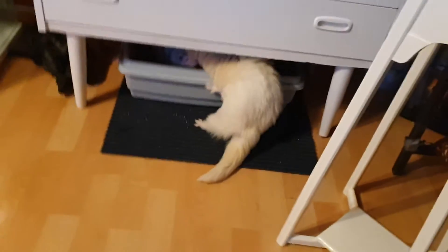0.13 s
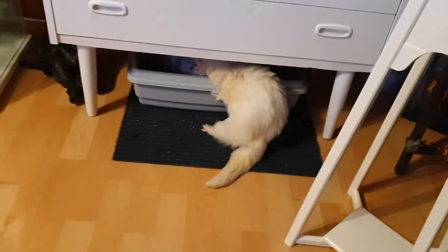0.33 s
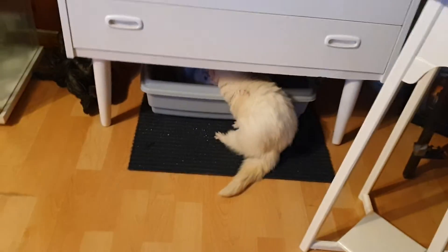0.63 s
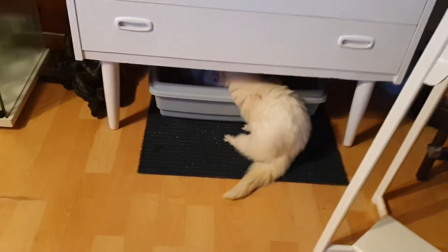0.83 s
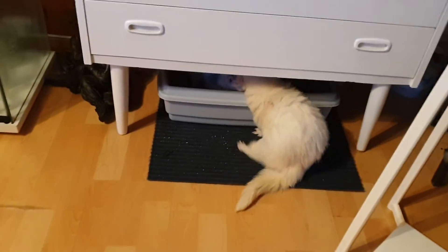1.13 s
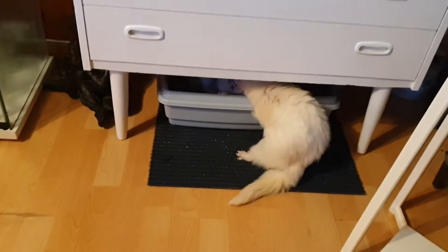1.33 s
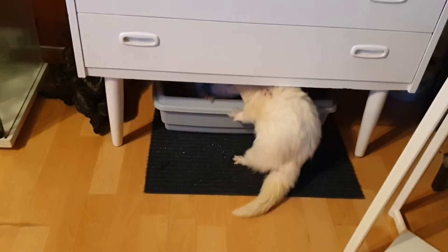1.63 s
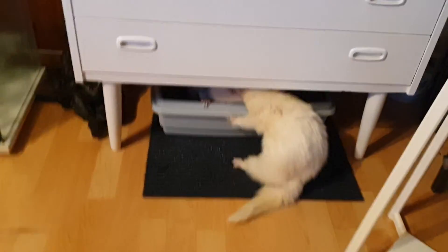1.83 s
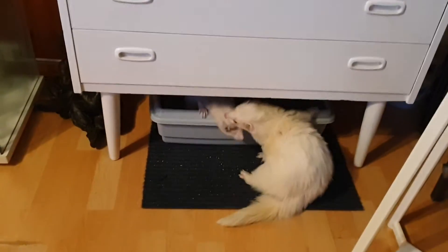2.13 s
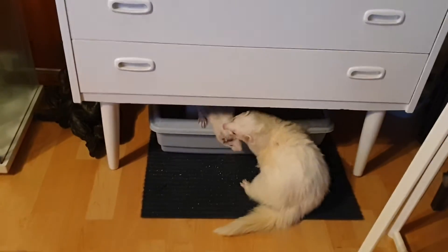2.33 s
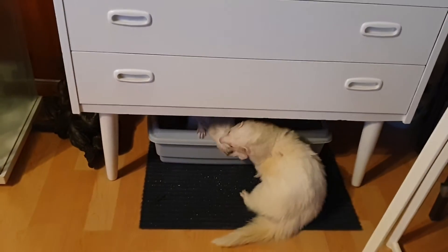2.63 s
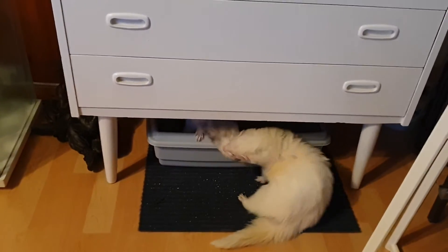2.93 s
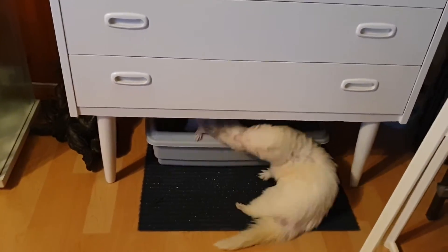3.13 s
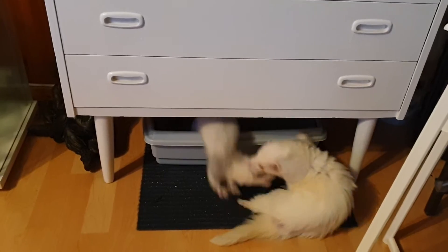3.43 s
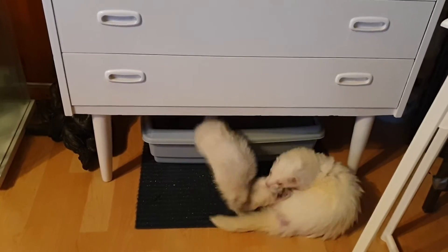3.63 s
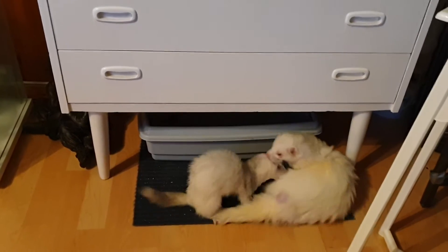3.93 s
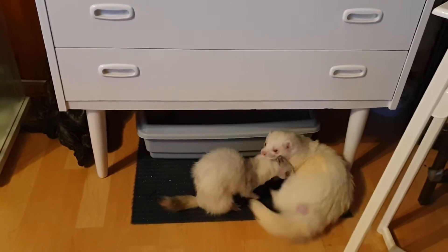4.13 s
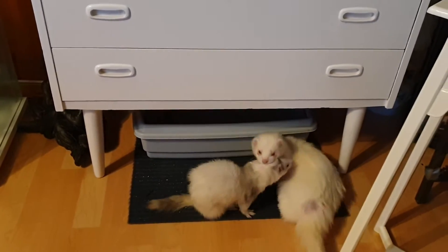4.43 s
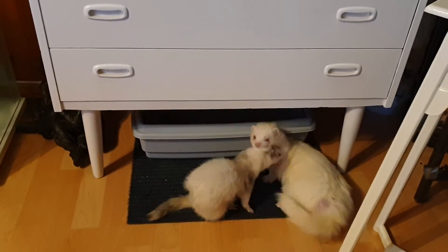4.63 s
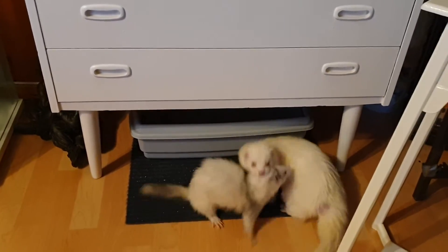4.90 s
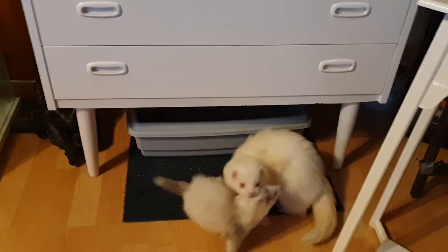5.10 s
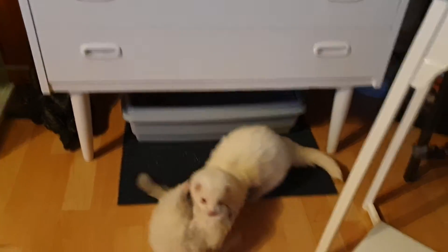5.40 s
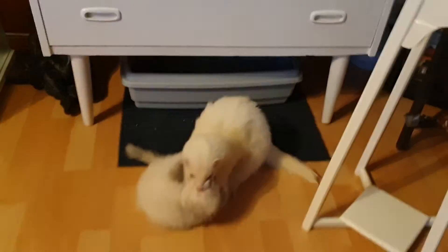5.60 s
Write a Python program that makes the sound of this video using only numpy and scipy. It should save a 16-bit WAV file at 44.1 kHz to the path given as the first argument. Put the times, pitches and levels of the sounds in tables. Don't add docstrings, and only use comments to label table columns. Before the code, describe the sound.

Two ferrets wrestle at a plastic tub on a rubber mat and wooden floor, heard close in a small room over a soft steady hush, the left side louder. Around 0.5 s a cluster of hollow tub thumps and claw scrapes breaks out, with a thin nose whistle just before. From 0.7 to 1.9 s there are faint muffled clucks, hoarse grunts and little chirps, with a hard claw click at 1.5 s. Around 2 to 2.7 s the tub booms again amid dense scratching and fur hiss. At 3.5 s the clucks become clear and loud, about eleven a second; a shrill squeal leaps up near 3.7 s with more thumps. Clucking continues in short runs, with a breathy nose sound near 4.3 s. A sharp claw tick lands at 5.2 s, two yips and brushing fur follow at 5.4 s, and a longer, strong cluck closes at 5.75 s.

```python
import sys
import numpy as np
from scipy import signal
from scipy.fft import rfft, irfft
from scipy.io import wavfile
from scipy.ndimage import uniform_filter1d

SR = 44100
rng = np.random.default_rng(int(sys.argv[2]) if len(sys.argv) > 2 else 0)


def boost(x):
    u = np.asarray(x, float) / 20
    return 10 ** u


def to_wav(sig):
    pcm = np.clip(np.atleast_2d(sig), -1, 1) * 32767
    pcm = np.round(pcm).astype(np.int16)
    wavfile.write(sys.argv[1], SR, pcm.T)


N = 254016


def evened(x):
    return x / np.sqrt(np.mean(x ** 2) + 1e-20)


def read(points, hz):
    f, value = np.transpose(points)
    return np.interp(np.log(hz + 1), np.log(f + 1), value)


def add(mix, s, sound):
    part = mix[..., round(s * SR):][..., :sound.shape[-1]]
    part += sound[..., :part.shape[-1]]


def wander(size, seconds):
    span = max(int(seconds * SR), 2)
    smooth = uniform_filter1d(rng.standard_normal(size), span)
    return evened(uniform_filter1d(smooth, span))


def bandpassed(size, order, low_hz, high_hz):
    band = signal.butter(order, [low_hz, high_hz], "bandpass", fs=SR, output="sos")
    return signal.sosfilt(band, rng.standard_normal(size))


def swelling_sine(hz, t, rise_s, decay_s):
    return np.sin(2 * np.pi * hz * t) * (t / rise_s) * np.exp(1 - t / decay_s)


def noise(size, field_db, patchy_db):
    # f/Hz, coherence/1
    likeness = [(60, 0.89), (180, 0.83), (550, 0.59), (1650, 0.3), (4970, 0.041), (15000, 0.028)]
    frames, hz = size // 64 + 5, np.fft.rfftfreq(256, 1 / SR)[:, None]
    a, b, c, d, patches = rng.standard_normal((frames, 129, 5)).T
    patches = evened(uniform_filter1d(uniform_filter1d(patches, 9, 0), 30, 1))
    same, left = read(likeness, hz), a + 1j * b
    right = same * left + np.sqrt(1 - same ** 2) * (c + 1j * d)
    z = np.array([left, right]) * boost(field_db(hz) + patchy_db * patches)
    return signal.istft(z, nperseg=256, noverlap=192)[1][:, :size]


def coloured(points, same):
    a, b = rng.standard_normal((N, 2)).T
    z = rfft(np.array([a, same * a + np.sqrt(1 - same ** 2) * b]))
    return evened(irfft(z * boost(read(points, np.fft.rfftfreq(N, 1 / SR))), N))


def hush():
    # f/Hz, level/dB per Hz
    hush_spectrum = [(25, 7), (400, -2.5), (1540, -9.5), (5900, -24.5), (7270, -13.5), (8520, -22.5),
                     (10800, -14.5), (16000, -23)]
    return boost(-67.5 - 3) * coloured(hush_spectrum, same=0.074)


def room(x):
    # f/Hz, t60/s
    decay = [(100, .3), (500, .22), (1500, .18), (5000, .2), (14000, .14)]
    taps = np.zeros((2, SR // 2))
    at = np.arange(160, SR // 2 - 20, 20) + rng.integers(0, 20, (2, (SR // 2 - 161) // 20))
    np.put_along_axis(taps, at, rng.choice([-1., 1.], at.shape), 1)
    hz, t, z = signal.stft(taps, SR, nperseg=256)
    same = 1 / (1 + (hz[:, None] / 420) ** 4)
    z[1] = same * z[0] + np.sqrt(1 - same ** 2) * z[1]
    tail = signal.istft(z * boost(-60 * t / read(decay, hz)[:, None]), SR, nperseg=256)[1]
    return signal.fftconvolve(x, tail / np.linalg.norm(tail[0]), axes=1)[:, :N]


def weight():
    # f/Hz, level/dB per Hz
    shuffle = [(60, -5), (120, -6.5), (200, -2.5), (450, -7), (850, -13.5), (1600, -23), (4000, -33)]
    # t/s, level/dB
    shifts = [(0, -67), (.4, -65.5), (.65, -54.5), (.8, -70), (1.0, -76.5), (1.3, -90), (1.55, -69.5),
              (1.9, -64), (2.7, -62.5), (3.05, -66.5), (3.5, -62.5), (3.9, -66), (4.4, -69.5), (4.7, -75),
              (5.76, -72)]
    # t/s, level/dB
    booms = [(0.067, -55.5), (0.527, -50), (0.569, -52), (1.42, -61.5), (1.991, -52.5), (2.277, -59.5),
             (2.339, -65), (2.627, -48.5), (2.678, -60), (3.486, -59.5), (3.668, -49.5), (3.95, -66),
             (4.179, -58), (5.456, -67), (5.718, -62)]
    level_db = np.interp(np.arange(N) / SR, *np.transpose(shifts))
    out = coloured(shuffle, same=0.59) * boost(level_db + 5.16 * wander(N, 0.038))
    t = np.arange(SR // 5) / SR
    for s, db in booms:
        boom = swelling_sine(68 * rng.uniform(0.7, 1.186), t, 0.015, 0.02)
        add(out, s - .01, boost(db) * boom[None])
    return out


def wheeze():
    # start t/s, end t/s, f/Hz, level/dB
    breaths = [
        (4.214, 4.316, 3000, -73.5),
        (4.228, 4.304, 5060, -76),
        (4.332, 4.485, 1460, -68.5),
        (0.753, 1.825, 7560, -81),
        (1.016, 1.215, 14400, -77),
        (1.067, 1.148, 9660, -71),
        (1.078, 1.323, 11100, -79),
    ]
    # start t/s, end t/s, f/Hz, level/dB
    whistles = [
        (0.23, 0.525, 1896, -66.5),
        (3.13, 3.344, 1950, -74),
    ]
    bands = [(0.1, *row) for row in breaths] + [(0.065, *row) for row in whistles]
    out = np.zeros((2, N))
    for share, start, end, hz, db in bands:
        t = np.arange(int((end - start) * SR)) / SR
        drift_s = .35 / (share * hz)
        a, b = wander(len(t), drift_s), wander(len(t), drift_s)
        band = a * np.cos(2 * np.pi * hz * t) + b * np.sin(2 * np.pi * hz * t)
        add(out, start, boost(db) * np.array([band, band[::-1]]) * signal.windows.tukey(len(t), 0.6))
    return out


def fur():
    # start t/s, end t/s, brightest f/Hz, spread/log Hz, level/dB
    drags = [(0, 0.155, 9000, 0.72, -66.5), (0.61, 0.785, 8800, 1.6, -64), (1.336, 1.45, 2780, 0.19, -65.5),
             (1.85, 1.959, 9200, 1.07, -51), (2.275, 2.355, 2810, 0.17, -61),
             (2.134, 2.193, 8100, 0.067, -61.5), (2.595, 2.745, 10400, 0.12, -66),
             (1.342, 1.387, 8600, 0.31, -66.5), (1.529, 1.634, 7550, 0.5, -67),
             (1.672, 1.76, 7300, 0.15, -74.5), (1.681, 1.753, 2800, 0.2, -76.5),
             (1.975, 2.115, 6950, 1.8, -53.5), (2.559, 2.785, 8450, 1.2, -61.5),
             (2.758, 2.876, 4400, 0.65, -65.5), (3.126, 3.23, 5200, 0.59, -62),
             (3.38, 3.45, 4470, 0.05, -66), (3.677, 3.954, 9900, 0.52, -65),
             (5.222, 5.339, 5700, 0.83, -59.5)]
    # start t/s, end t/s, brightest f/Hz, spread/log Hz, level/dB
    brushes = [(0.251, 0.522, 9400, 0.1, -78), (0.436, 0.514, 8000, 0.44, -71),
               (3.385, 3.65, 6300, 1.8, -57), (3.955, 4.295, 7140, 0.4, -77), (4.211, 4.55, 9140, 0.4, -63),
               (4.358, 4.51, 5470, 0.31, -68.5), (5, 5.174, 7400, 1.02, -63.5),
               (5.359, 5.66, 9200, 0.75, -60.5), (5.4, 5.451, 7000, 0.17, -55.5),
               (5.397, 5.463, 2900, 0.24, -59.5), (5.43, 5.506, 5730, 0.23, -59),
               (5.422, 5.538, 10600, 0.16, -59.5), (2.839, 2.937, 3200, 0.31, -68),
               (2.863, 2.96, 7360, 0.26, -69), (5.553, 5.826, 8150, 1.33, -60)]
    strokes = [(0.05, *row) for row in drags] + [(0.48, *row) for row in brushes]
    out = np.zeros((2, N))
    for crest, start, end, bright_hz, spread, db in strokes:
        size = int((end - start) * SR)
        hiss = noise(size, lambda hz: -9 * (np.log((hz + 1) / bright_hz) / spread) ** 2, patchy_db=2.6)
        grain = boost(2.5 * wander(size, .004))
        swell = np.interp(np.arange(size) / size, [0, crest, 1], [0, 1, 0])
        add(out, start, boost(db) * grain * evened(hiss) * np.sin(np.pi / 2 * swell) ** 1.13)
    return out


def ticks():
    # t/s, level/dB, ring f/Hz
    taps = [(0.056, -47, 8700), (0.443, -54, 10000), (0.572, -36, 2420), (0.626, -39, 11000),
            (1.518, -28, 9400), (2.105, -39, 11000), (2.28, -40, 12000), (2.786, -46, 5840),
            (2.881, -51, 6740), (2.954, -49, 7000), (3.384, -43, 4400), (3.844, -52, 10600),
            (4.327, -39, 10700), (4.383, -44, 9600), (5.229, -25.5, 11600), (5.295, -52, 10000),
            (5.356, -39, 10860)]
    out, t = np.zeros(N), np.arange(200) / SR
    for s, db, hz in taps:
        decay_s = 1.64 / hz
        add(out, s, boost(db) * np.sin(2 * np.pi * hz * t) * np.exp(-t / decay_s))
    return out[None]


def claws():
    # t/s, level/dB, dull part re bright/dB, t60/s, brightest f/Hz
    scratches = [(0.117, -44, -14, 0.086, 5700), (0.5206, -46.5, 4, 0.12, 10500),
                 (0.535, -43, 4, 0.1, 9500), (0.568, -32, 0.5, 0.065, 2440),
                 (0.625, -48.5, -20, 0.18, 10500), (1.307, -54.5, -29, 0.15, 7800),
                 (1.43, -51.5, 3, 0.085, 10000), (1.518, -34.5, -15, 0.14, 8200),
                 (1.8508, -46.5, -0.5, 0.43, 7900), (1.977, -35.5, -7.5, 0.28, 4830),
                 (2.005, -36, -5, 0.03, 3020), (2.0125, -38, 2, 0.022, 4000),
                 (2.105, -42.5, -10, 0.072, 9600), (2.136, -33.5, -4, 0.069, 8320),
                 (2.253, -42.5, -26, 0.071, 8100), (2.2796, -31.5, -11, 0.069, 8700),
                 (2.4512, -48, -6, 0.095, 7700), (2.4833, -47, -1, 0.075, 3070),
                 (2.532, -51.5, -12, 0.15, 9500), (2.547, -42.5, -12, 0.17, 9600),
                 (2.56, -40.5, -7.5, 0.1, 7300), (2.954, -48.5, -6, 0.1, 7050),
                 (3.0793, -48, -3.5, 0.24, 5000), (3.134, -49, 9, 0.3, 6500), (3.384, -40, -3, 0.2, 4440),
                 (3.498, -41, -5, 0.18, 6900), (3.609, -48, -6, 0.18, 6560),
                 (3.748, -41.5, -10, 0.063, 10300), (5.004, -44.5, -48, 0.58, 9900),
                 (5.206, -49.5, -23, 0.28, 9500), (5.2297, -29, -23.5, 0.039, 7800),
                 (5.3568, -51, -11, 0.23, 7000)]
    # f/Hz, level/dB per Hz
    scratch_spectrum = [(900, -12), (1800, -5), (3000, -1.5), (4800, -3.5), (7700, 3), (13000, -1.5),
                        (16000, -12)]
    out, t = np.zeros((2, N)), np.arange(SR // 4) / SR
    for s, db, dull_db, t60, bright_hz in scratches:
        def scrape_db(hz):
            tip = 5 * np.exp(-(np.log((hz + 1) / bright_hz) / 0.12) ** 2)
            dull = (dull_db + 10.0) / (1 + (hz / 3700) ** 6)
            return read(scratch_spectrum, hz) + tip + dull
        grit = evened(noise(len(t), scrape_db, patchy_db=2.2))
        slips = boost(0.2 * wander(len(t), 0.00057))
        fade = boost(-60 * np.maximum(t - 0.066 * t60, 0) / t60)
        catch = 1 + 0.63 * np.exp(-t / 0.0017)
        add(out, s - .001, boost(db - 12.5) * grit * slips * fade * catch)
    return out


def thumps():
    # t/s, blow level/dB, slap re blow/dB
    blows = [(0.054, -42.5, -10.5), (0.124, -44, -40), (0.467, -33, -18), (0.483, -36.5, -1.5),
             (0.519, -38, -10), (0.536, -28, -12.5), (0.5666, -38.5, 0.5), (0.572, -30.5, -1.5),
             (1.53, -49.5, -7.5), (1.873, -52.5, 1.5), (1.981, -31.5, -14.5), (2.003, -27, -12),
             (2.016, -51, -3), (2.138, -43.5, -3.5), (2.545, -43, -12), (2.608, -36, -21),
             (2.641, -27, -15), (3.083, -36, -10.5), (3.385, -46, -5.5), (3.417, -49.5, 6),
             (3.491, -38.5, -5), (3.62, -46.5, -1), (3.673, -31.5, -12), (3.685, -37, -7), (4.177, -53, -8),
             (4.327, -53.5, -4.5), (5.738, -49, -50)]
    # f/Hz, level/dB, t60/s
    wall_modes = [
        (272, -12, 0.11),
        (386, -11, 0.08),
        (591, -12.5, 0.046),
        (750, -21, 0.048),
    ]
    out, t = np.zeros(N), np.arange(SR // 5) / SR
    for s, db, slap_db in blows:
        base_hz = 195.4 if s < 3.6 else 169.4
        base_hz *= rng.uniform(0.893, 1.114)
        belly = swelling_sine(base_hz, t, 0.0055, 0.0065)
        belly += 0.49 * swelling_sine(1.45 * base_hz, t, 0.0054, 0.0054)
        walls = np.zeros(len(t))
        for f, level_db, t60 in wall_modes:
            mode_hz = f * rng.uniform(0.903, 1.061)
            walls += boost(level_db - 60 * t / t60) * np.sin(2 * np.pi * mode_hz * t)
        contact = evened(bandpassed(len(t), 3, 330, 950))
        contact *= boost(-60 * t / 0.065) * (1 - np.exp(-t / 0.0021))
        slap = contact + walls * boost(11.5)
        add(out, s - .001, boost(db - 4.5) * belly + boost(db + slap_db - 2.5) * slap)
    return out


def cluck(db, second_hz, first_db, length, halves):
    # f/Hz, level/dB
    throat_curve = [(500, 0), (1300, 0), (1550, -26), (1800, -22), (2100, -44), (3000, -50), (4500, -60)]
    t = np.arange(int(min(length, .06) * SR)) / SR
    arch = np.sin(np.pi * t / t[-1])
    hz = second_hz / 2 * (1.012 + .02 * arch - .05 * t / t[-1] + .017 * wander(len(t), .003))
    turns = np.cumsum(hz) / SR + rng.random()
    lines = boost(first_db) * np.sin(2 * np.pi * turns)
    for k in range(2, 9):
        lines += boost(read(throat_curve, k * second_hz / 2)) * np.cos(2 * np.pi * k * turns)
    lines *= 1 + halves * np.cos(np.pi * turns) + .1 * wander(len(t), .003)
    hoarse = evened(bandpassed(len(t), 4, 450, 1400))
    rasp = evened(bandpassed(len(t), 2, 2600, 4500))
    air = .26 * (halves + .4) * hoarse + .03 * halves * rasp
    swell = signal.windows.tukey(len(t), .35) * (.5 + .5 * arch) * (1 - 0.14 * t / t[-1])
    return boost(db - 7.5) * (lines + air) * swell


def grunt(db, pulse_hz, throat_db):
    t = np.arange(int(.035 * SR)) / SR
    turns = np.cumsum(pulse_hz * (1 + .1 * wander(len(t), .005))) / SR + rng.random()
    puffs = np.exp(-(turns % 1) / .25) * (rng.standard_normal(len(t)) + .5)
    dark = signal.butter(4, [420, 1250], "bandpass", fs=SR, output="sos")
    throat = evened(signal.sosfilt(dark, puffs))
    body = np.cos(2 * np.pi * turns) * (1 + 0.68 * wander(len(t), 0.0094))
    swell = signal.windows.tukey(len(t), .4) * np.exp(-t / 0.024)
    return boost(db) * (body * np.sin(np.pi * t / t[-1]) + boost(throat_db) * throat * swell)


def squeal(rows, slope_db, open_db):
    s, *columns = np.transpose(rows)
    t = np.arange(s[0], s[-1], 1 / SR)
    hz, db = (np.interp(t, s, c) for c in columns)
    turns = np.cumsum(hz * (1 + 0.032 * wander(len(t), 0.0017))) / SR
    stack = np.cos(2 * np.pi * turns) + boost(slope_db) * np.cos(4 * np.pi * turns)
    for k in range(3, 5):
        from_3k = np.log(k * hz / 3100) ** 2
        from_5k = np.log(k * hz / 4900) ** 2 + 0.0069
        mouth_db = open_db - 250 * np.minimum(from_3k, from_5k).clip(0, .08)
        stack += boost(mouth_db) * np.cos(2 * np.pi * k * turns)
    edges = np.clip(np.minimum(t - t[0], t[-1] - t) / .002, 0, 1)
    return s[0], boost(db) * stack * (1 + 0.16 * wander(len(t), 0.0026)) * edges


def cry(start, length, first_hz, last_hz, db, slope_db, open_db):
    share = np.array([0, 0.53, 1])
    hz = first_hz + (last_hz - first_hz) * share
    rows = [start + length * share, hz, db + np.array([-10, 0, -4])]
    return squeal(np.transpose(rows), slope_db, open_db)


def voices():
    # t/s, effort level/dB, second harmonic f/Hz, length/s, strong-weak pulses/0-1
    tub_clucks = [
        (0.744, -52.5, 1023, 0.018, 0.45),
        (0.829, -49.5, 1067, 0.042, 0.26),
        (0.9257, -53.5, 1020, 0.024, 0.28),
        (1.9415, -44, 1026, 0.037, 0.1),
        (2.473, -41.5, 1026, 0.025, 0.7),
        (3.049, -48, 1048, 0.037, 0.76),
        (3.412, -41.5, 1103, 0.019, 0.75),
    ]
    # t/s, effort level/dB, second harmonic f/Hz, length/s, strong-weak pulses/0-1
    open_clucks = [(3.508, -36, 1140, 0.03, 0.4), (3.6082, -28, 1223, 0.025, 0.14),
                   (3.696, -28, 1260, 0.029, 0.36), (3.805, -37.5, 1109, 0.024, 0.43),
                   (3.8864, -36, 1156, 0.023, 0.52), (3.9865, -33.5, 1170, 0.026, 0.1),
                   (4.08, -35.5, 1141, 0.028, 0.13), (4.158, -35.5, 1143, 0.036, 0),
                   (4.242, -32.5, 1179, 0.042, 0.36), (4.497, -44.5, 1019, 0.03, 0.27),
                   (4.6044, -42.5, 1034, 0.03, 0.45), (4.702, -41.5, 1060, 0.029, 0.44),
                   (4.78, -32.5, 1138, 0.033, 0.18), (4.877, -37, 1070, 0.019, 0),
                   (4.9702, -35.5, 1122, 0.029, 0.06), (5.214, -39, 1080, 0.016, 0.15),
                   (5.41, -40, 1101, 0.029, 0.63), (5.496, -33, 1109, 0.026, 0.08),
                   (5.5942, -41, 1030, 0.023, 0.7), (5.671, -36, 1122, 0.023, 0.56),
                   (5.7524, -26, 1274, 0.072, 0.16)]
    # t/s, effort level/dB, pulse f/Hz
    grunts = [(0.057, -61, 216), (0.27, -59, 214.4), (0.369, -58.5, 194), (0.756, -51.5, 229),
              (1.301, -59, 213), (1.407, -55, 247), (1.488, -49, 219.4), (1.593, -57, 208.4),
              (1.675, -54, 213.6), (1.772, -49, 223.6), (1.847, -48.5, 238.5), (2.08, -58, 201),
              (2.189, -53, 297), (2.328, -55, 247), (2.386, -57, 342), (2.479, -50, 235.5),
              (2.773, -56, 340.4), (2.852, -52.5, 332), (2.949, -52, 235.3), (3.129, -50.5, 331.3),
              (3.226, -51.5, 241), (3.384, -57, 265), (3.487, -48.5, 255.5), (3.89, -49.5, 256),
              (5.357, -59, 292), (5.677, -50, 240)]
    # start t/s, length/s, first f/Hz, last f/Hz, level/dB
    chirps = [
        (1.253, 0.0185, 750, 746, -56.5),
        (1.333, 0.015, 750, 855, -48.5),
        (3.659, 0.016, 843, 905, -45.5),
    ]
    # start t/s, length/s, first f/Hz, last f/Hz, level/dB
    yips = [
        (1.348, 0.014, 1040, 950, -47),
        (3.968, 0.029, 870, 839, -46),
        (5.403, 0.022, 560, 800, -47),
        (5.43, 0.028, 943, 1258, -45),
    ]
    # t/s, pitch f/Hz, effort level/dB
    squeals = [
        [(3.66, 836, -50), (3.672, 873, -39.5), (3.69, 934, -41.5), (3.703, 1388, -42), (3.712, 1683, -36),
         (3.722, 1600, -44)],
        [(3.7315, 1510, -32), (3.738, 1450, -33), (3.746, 1500, -37), (3.75, 1620, -30.5), (3.757, 1660, -36),
         (3.766, 1650, -39), (3.778, 1580, -50), (3.803, 1610, -48)],
    ]
    out = np.zeros(N)
    for s, db, hz, *shape in tub_clucks:
        first_db = -45.5 - db
        add(out, s - .0055, cluck(db, hz, first_db, *shape))
    for s, db, hz, *shape in open_clucks:
        add(out, s - .0055, cluck(db, hz, -5, *shape))
    for s, db, hz in grunts:
        throat_db = -6 if s < 3.3 else 3.5
        add(out, s - .004, grunt(db, hz, throat_db))
    for row in chirps:
        add(out, *cry(*row, slope_db=1, open_db=-8))
    for row in yips:
        add(out, *cry(*row, slope_db=-21, open_db=-28))
    for rows in squeals:
        add(out, *squeal(rows, slope_db=-13, open_db=-21.5))
    return out


def scene():
    calls, blows, scratches = voices()[None], thumps()[None], claws() + ticks()
    wet = boost(-7.0) * calls + boost(-10) * blows + boost(-6.5) * scratches
    near = calls + blows + scratches + fur() + weight() + wheeze()
    return near + room(wet) + hush()


def top_cut(x):
    return signal.sosfilt(signal.butter(12, 16490, fs=SR, output="sos"), x)


def record(dry):
    # f/Hz, level/dB
    lean = [(60, 4.5), (200, 3.8), (600, 7), (1600, 7), (4500, 8), (9000, 2.2), (15000, 1.5)]
    hz = np.fft.rfftfreq(N, 1 / SR)
    ports = boost(np.array([[.5], [-.5]]) * read(lean, hz))
    capsule = (hz < 15900) / np.sqrt(1 + (58 / (hz + 1)) ** 6)
    return top_cut(irfft(rfft(dry) * ports * capsule, N))


dry = scene()
out = record(dry)
to_wav(out)
```